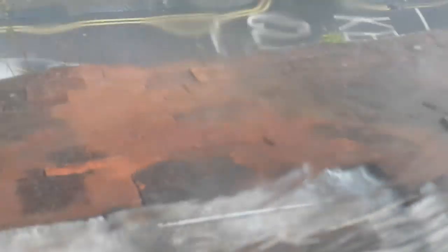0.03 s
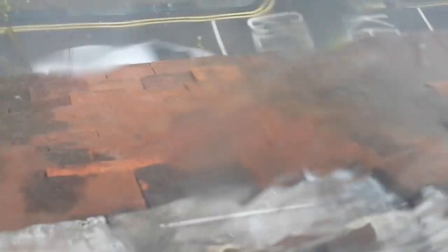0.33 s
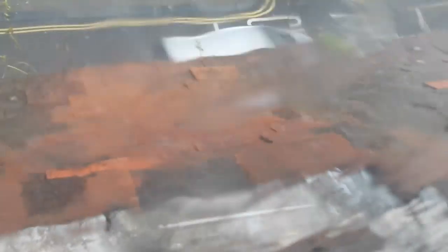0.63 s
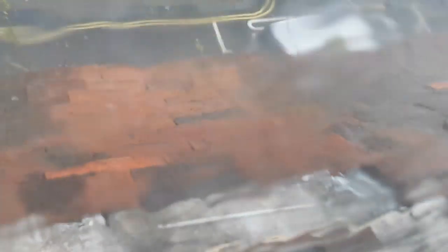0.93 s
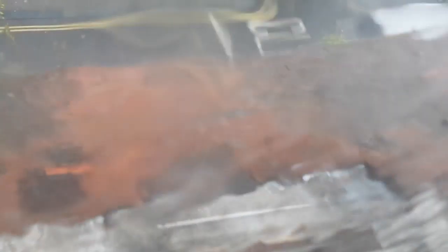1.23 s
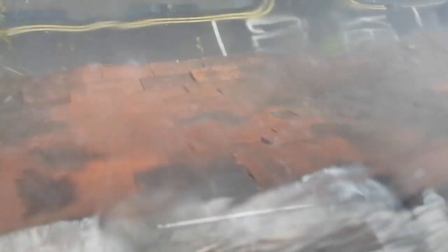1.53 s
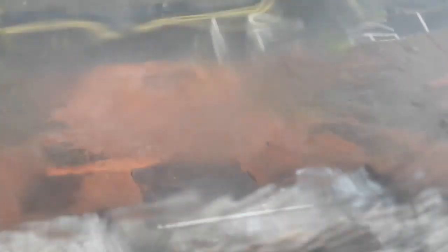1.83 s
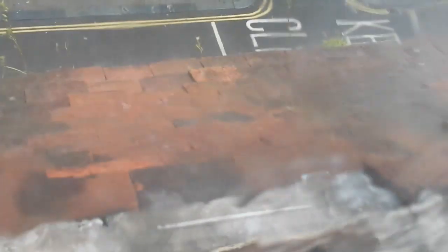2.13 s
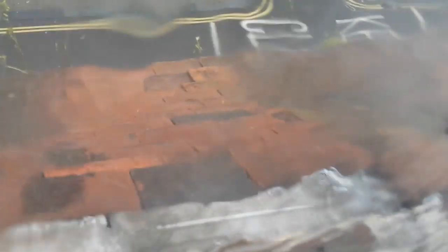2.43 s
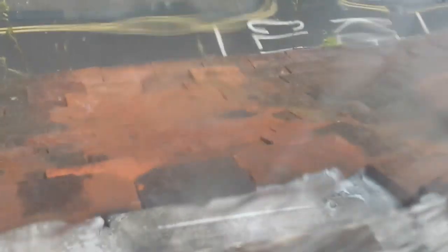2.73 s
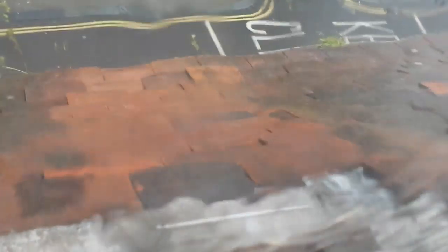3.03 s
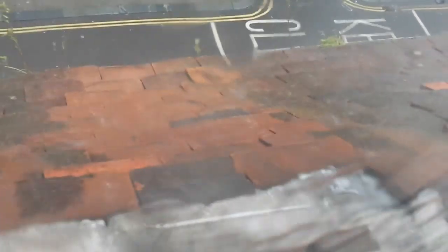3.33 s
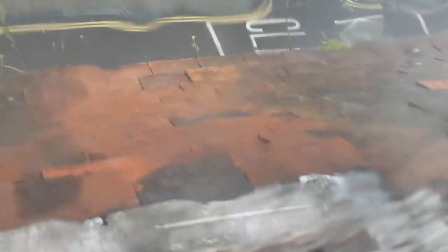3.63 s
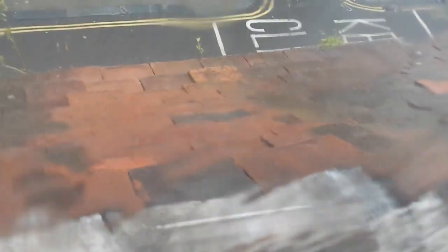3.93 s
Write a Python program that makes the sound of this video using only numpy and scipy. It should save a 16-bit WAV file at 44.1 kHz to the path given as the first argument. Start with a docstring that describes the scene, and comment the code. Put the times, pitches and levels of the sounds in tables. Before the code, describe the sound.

Heavy rain and hail strike a window, heard from just behind the glass over a low roof rumble. A gust thickens the hail, a car hisses past on the wet street, then the rain softens.

```python
"""Heavy rain and hail on a window, heard from just behind the glass. From the start, small drops
spatter and heavy ones patter over the wash of the street, the roof below rumbles, and single
hailstones ping, tick and knock close by. Half a second in, a gust swells the rain and makes the
pane drum; the hail comes thicker, and at 1.4 s a car hisses past on wet tyres. Soon after 2 s
the gust drops, leaving softer rain and a few stray stones."""
import sys
import numpy as np
from scipy import signal
from scipy.fft import rfft, irfft, next_fast_len
from scipy.io import wavfile
from scipy.ndimage import map_coordinates

SR = 44100
rng = np.random.default_rng(int(sys.argv[2]) if len(sys.argv) > 2 else 0)


def put_to_file(sound):
    """Save the sound as 16-bit audio at rate SR, in the file named by the first command-line argument."""
    columns = np.atleast_2d(sound).T  # one column per channel
    safe = np.clip(columns, -1, 1)
    whole_steps = np.round(safe * 32767)
    wavfile.write(sys.argv[1], SR, whole_steps.astype(np.int16))


N = 176400

# The gust as three fader rides, before trims (time [s], spatter [dB], patter [dB], drumming [dB])
STORM_FADERS = [(0, -36, -41.5, -39.5), (0.44, -35.5, -40.5, -37.5), (0.56, -30, -34, -34.5),
                (0.8, -29, -33.5, -31.5), (1.0, -31, -35, -33.5), (1.12, -25, -32.0, -32),
                (1.3, -26, -31.5, -30.5), (1.48, -29, -35, -35.5), (1.68, -23.5, -30.5, -32.5),
                (1.86, -29, -36, -31), (1.98, -26.5, -35.5, -36), (2.2, -34, -37.5, -36.5),
                (2.45, -36.5, -46.5, -40), (2.9, -38, -46.5, -40.5), (3.3, -37.5, -41, -36.5),
                (3.57, -36.5, -40.5, -35), (3.68, -38, -41.5, -39.5), (4, -39, -43.5, -36.5)]
# EQ of small drops, heavy drops, rain on the street and the roof (frequency [Hz], gain [dB])
SPATTER_EQ = [(700, -11), (1500, -5), (2060, -0.5), (2830, -6), (3600, -1), (4700, -2.5), (5700, 0),
              (6900, -2), (8200, -10.5), (10500, -18), (12000, -41), (15000, -47)]
PATTER_EQ = [(120, -38), (280, -5), (480, 2.5), (900, 2.5), (1130, -3.5), (1450, 2.5), (2060, -4.5),
             (2600, -10), (5000, -71)]
STREET_EQ = [(900, -46), (1170, -6.5), (1420, 0.5), (1960, -1.5), (2130, 5), (2810, -3), (3650, -5),
             (5040, -7), (6410, -2.5), (10400, -20.5), (11700, -60)]
ROOF_EQ = [(38, -40), (50, -19), (62, -7), (85, -2.5), (120, -5), (160, -1.5), (200, -1), (260, -7.5),
           (330, -12), (420, -18.5), (900, -93)]
# Cues for small stones that ring, and that only tick (time [s], relative level [dB], pitch [Hz])
PING_CUES = [(0.058, -31, 6760), (0.767, -24, 5290), (1.737, -28.5, 6600), (3.7328, -20.5, 5750)]
TICK_CUES = [(0.116, -25, 6050), (0.395, -26, 4960), (0.499, -30, 4820), (0.697, -25, 5200),
             (0.73, -22.5, 6000), (0.8138, -21.5, 3800), (0.837, -26, 5600), (0.861, -22.5, 5800),
             (0.9018, -20.5, 6800), (0.911, -24, 6200), (1.087, -22, 6570), (1.155, -25, 5800),
             (1.182, -26, 6000), (1.282, -22, 6500), (1.287, -20, 5560), (1.358, -20, 5600),
             (1.366, -22, 3700), (1.392, -23.5, 5000), (1.581, -22.5, 7540), (1.6, -15.5, 5770),
             (1.676, -28, 3970), (1.685, -18.5, 5430), (1.76, -29, 4500), (1.806, -24.5, 6300),
             (1.865, -25.5, 5840), (1.96, -20.5, 6800), (2.02, -31, 6860), (3.056, -31.5, 5260),
             (3.541, -33, 3900), (3.786, -26, 5960)]
# EQ of cracking ice (frequency [Hz], gain [dB])
CRACK_EQ = [(300, -20), (1200, 3), (2000, 7), (3000, 6.5), (6300, 8), (8000, 2), (11000, -9), (15000, -25)]
# Cues for big stones (time [s], relative level [dB], pitch [Hz], crack level [dB])
KNOCK_CUES = [(0.294, -26, 1640, -31.5), (0.508, -23.5, 1790, -29.5), (0.638, -26, 2000.0, -18.5),
              (0.786, -22.5, 1300, -34), (1.0447, -13.5, 1340, -21), (1.173, -23.5, 2010, -29),
              (1.271, -16.5, 2400, -25), (1.279, -20, 895, -26), (1.302, -23, 1440, -19.5),
              (1.306, -20, 1090, -20), (1.335, -17.5, 1900, -29), (1.634, -27, 700, -31),
              (1.745, -24, 1200, -24), (1.756, -19.5, 1600, -21), (1.85, -23.5, 1500, -33),
              (2.099, -27, 1600.0, -26.5), (2.169, -24.5, 1770, -30.5), (2.2966, -19, 1430, -26.5),
              (2.3446, -17.5, 780, -46), (3.119, -30.5, 850, -38)]
# Modes of the struck glass (frequency [Hz], gain [dB], T60 [s])
GLASS_MODES = [(370, -2, 0.069), (500, 1, 0.027), (950, -1.5, 0.0098), (1190, 1, 0.01), (1420, 2, 0.018),
               (2033, -1, 0.025)]
# EQ of wet tyres (frequency [Hz], gain [dB])
TYRE_EQ = [(200, -2), (800, -4), (2000, -3.5), (5500, 5), (8000, 0), (12000, -76)]
# Stereo image of rain, roof and car (frequency [Hz], left-right correlation [-1..1])
STEREO_IMAGE = [(60, .97), (220, 0.98), (400, 0.56), (950, 0.42), (1400, -0.13), (2200, -0.12),
                (3500, 0.083)]
# Tonal balance of the microphones (frequency [Hz], left minus right [dB])
MIC_BALANCE = [(200, -0.5), (500, 1.5), (950, -5), (1350, -1.5), (2080, 7), (2800, 1.5), (3700, 4.5),
               (5600, 3.5), (6900, -6), (8500, -2.5), (13000, -7.5)]

SPATTER_TRIM_DB, PATTER_TRIM_DB, STREET_DB, ROOF_TRIM_DB = 0.02, 0.9, -39, -0.5
SPATTER_GROWTH, PANE_GROWTH = 1.06, 1.6  # dB per dB of fader
PANE_HZ, PANE_T60_S, PANE_DB = 173.2, 0.086, -43.5  # the pane's lowest mode
CRACK_RISE_S, CRACK_T60_S, FOCUS_DB, FOCUS_OCTAVES = .0003, .014, 7.5, 0.48
PING_T60_S, PING_UPPER_RATIO, PING_CRACK_MIX = .034, 1.1, .45
TICK_TRIM_DB, KNOCK_TRIM_DB = 0.5, -0.5
KNOCK_OCTAVES, SPOT_SPREAD_DB, CONTACT_CYCLES = 0.4, 0.7, .18
CAR_NEAREST_S, CAR_DB, CAR_M_PER_S, CAR_DISTANCE_M = 1.4, -31.5, 13.4, 4.2
MIC_LAG_S, HIGH_CUT_HZ = .00027, 15700


def amp(db):
    return 10 ** (np.asarray(db) / 20)


def unit_rms(x):
    return x / np.sqrt(np.mean(x ** 2) + 1e-20)


def unit_attack(x):
    """Scale an impact to rms 1 over its first 5 ms."""
    return x / np.sqrt(np.mean(x[..., :SR // 200] ** 2))


def decay(t, t60):
    return amp(-60 * t / t60)


def curve(points, hz):
    """Read (frequency, value) points on a log frequency axis."""
    freqs, values = np.transpose(points)
    return np.interp(np.log(hz + 1), np.log(freqs + 1), values)


def filtered(x, response):
    """EQ x with a gain given as a function of frequency."""
    n = x.shape[-1]
    padded = next_fast_len(n + n // 4)
    return irfft(rfft(x, padded) * response(np.fft.rfftfreq(padded, 1 / SR)), padded)[..., :n]


def stereo_bed(pair, eq):
    """EQ two unrelated signals into a stereo bed of rms 1, near mono in the bass."""
    def response(hz):
        width = np.arccos(np.clip(curve(STEREO_IMAGE, hz), -1, 1)) / 2
        return amp(curve(eq, hz)) * [np.cos(width), np.sin(width)]
    mid, side = filtered(pair, response)
    return unit_rms(np.array([mid + side, mid - side]))


def place(out, time_s, hit):
    """Lay in a close hit; it reaches the right microphone first."""
    for channel, start in enumerate([time_s + MIC_LAG_S / 2, time_s - MIC_LAG_S / 2]):
        part = out[channel, max(round(start * SR), 0):][:hit.shape[1]]
        part += hit[channel, :len(part)]


def drops(per_s, t60, spread_db=3, spots=14):
    """Drops of random size land on many spots; each spot answers with its own short burst."""
    t = np.arange(SR // 25) / SR
    out = np.zeros((2, N))
    count = int(per_s * N / SR / spots)
    for _ in range(spots):
        burst = rng.standard_normal((2, len(t))) * decay(t, t60)
        onsets = (rng.random(count) * N).astype(int)
        sizes = amp(spread_db * np.clip(rng.standard_normal(count), -2, 2))
        hits = np.bincount(onsets, sizes, N)
        out += signal.oaconvolve(hits[None], unit_rms(burst), axes=1)[:, :N]
    return out


def rain(spatter_db, patter_db, flurry_db=.8, flurry_hz=25.9):
    """Small drops spatter and heavy ones patter on the glass, over the even wash of the street."""
    knots = rng.standard_normal(400)
    flutter_db = flurry_db * map_coordinates(knots, [np.arange(N) * flurry_hz / SR], mode="wrap")
    spatter_db = spatter_db.max() + SPATTER_GROWTH * (spatter_db - spatter_db.max())
    spatter = stereo_bed(drops(per_s=1800, t60=.011), SPATTER_EQ) * amp(spatter_db + SPATTER_TRIM_DB)
    patter = stereo_bed(drops(per_s=900, t60=.024), PATTER_EQ) * amp(patter_db + PATTER_TRIM_DB)
    street = amp(STREET_DB) * stereo_bed(rng.standard_normal((2, N)), STREET_EQ)
    return amp(flutter_db) * (spatter + patter) + street


def roof(drumming_db):
    """The low end: the roof rumbles under the downpour."""
    return amp(drumming_db + ROOF_TRIM_DB) * stereo_bed(rng.standard_normal((2, N)), ROOF_EQ)


def pane(drumming_db):
    """The pane booms in its lowest mode when the gust hits it."""
    t = np.arange(SR // 2) / SR
    ring = np.sin(2 * np.pi * PANE_HZ * t) * decay(t, PANE_T60_S)
    boom = unit_rms(signal.fftconvolve(rng.standard_normal(N), ring)[:N])
    return boom * amp(PANE_DB + PANE_GROWTH * (drumming_db - drumming_db.mean()))


def crack(t, pitch_hz):
    """Ice meets a hard surface: a bright, brief burst with a bell boost at its pitch."""
    envelope = (1 - np.exp(-t / CRACK_RISE_S)) * decay(t, CRACK_T60_S)
    burst = rng.standard_normal((2, len(t))) * envelope
    bell_db = lambda hz: FOCUS_DB * np.exp(-.5 * (np.log2((hz + 1) / pitch_hz) / FOCUS_OCTAVES) ** 2)
    return unit_attack(filtered(burst, lambda hz: amp(curve(CRACK_EQ, hz) + bell_db(hz))))


def hail_pings(t):
    """Small stones ring like glass: a crack, a ringing mode and a briefer one just above it."""
    out = np.zeros((2, N))
    for time_s, db, hz in PING_CUES:
        phase = rng.random((2, 1))  # one for each microphone
        lower = np.sin(2 * np.pi * (hz * t + phase)) * decay(t, PING_T60_S)
        upper = 2 * np.sin(2 * np.pi * (PING_UPPER_RATIO * hz * t + phase)) * decay(t, CRACK_T60_S)
        ring = unit_attack((lower + upper) * (1 - np.exp(-t / CRACK_RISE_S)))
        place(out, time_s, amp(db) * (ring + PING_CRACK_MIX * crack(t, hz)))
    return out


def hail_ticks(t):
    """Small stones tick: all crack, no ring."""
    out = np.zeros((2, N))
    for time_s, db, hz in TICK_CUES:
        place(out, time_s, amp(db + TICK_TRIM_DB) * crack(t, hz))
    return out


def hail_knocks(t):
    """Big stones knock the glass modes near their own pitch, with a crack on top."""
    out = np.zeros((2, N))
    mode_hz, mode_db, t60 = np.transpose(GLASS_MODES)[:, :, None]
    modes = np.cos(2 * np.pi * mode_hz * t) * decay(t, t60)
    for time_s, db, pitch_hz, crack_db in KNOCK_CUES:
        spot_db = rng.normal(0, SPOT_SPREAD_DB, mode_hz.shape)  # each spot favours other modes
        weights = amp(mode_db + spot_db) / (1 + (np.log2(mode_hz / pitch_hz) / KNOCK_OCTAVES) ** 2)
        attack = 1 - np.exp(-t * pitch_hz / CONTACT_CYCLES)  # dull blows rise more slowly
        body = unit_attack(attack * np.sum(weights * modes, axis=0))
        place(out, time_s, amp(db + KNOCK_TRIM_DB) * body + amp(crack_db) * crack(t, pitch_hz=4120))
    return out


def recess_reverb(hits, send_db=-15, t60=.05, predelay_s=.002):
    """The walls around the window give each hit a brief tail."""
    t = np.arange(SR // 8) / SR
    tail = rng.standard_normal((2, len(t))) * decay(t, t60) * (t > predelay_s)
    return amp(send_db) * signal.fftconvolve(hits, tail / np.linalg.norm(tail[0]), axes=1)[:, :N]


def car_pass():
    """Wet tyres hiss, swelling as the car nears and fading as it leaves."""
    distance = np.hypot(CAR_DISTANCE_M, CAR_M_PER_S * (np.arange(N) / SR - CAR_NEAREST_S))
    hiss = stereo_bed(rng.standard_normal((2, N)), TYRE_EQ)
    return amp(CAR_DB) * CAR_DISTANCE_M / distance * hiss


def scene():
    """The mix: rain, roof and pane ride the gust, under the hail and the passing car."""
    times, *faders = np.transpose(STORM_FADERS)
    spatter_db, patter_db, drumming_db = [np.interp(np.arange(N) / SR, times, db) for db in faders]
    beds = rain(spatter_db, patter_db) + roof(drumming_db) + pane(drumming_db)
    hit_t = np.arange(SR // 16) / SR  # time axis of one hailstone
    hail = hail_pings(hit_t) + hail_ticks(hit_t) + hail_knocks(hit_t)
    return beds + hail + recess_reverb(hail) + car_pass()


def record(dry):
    """Each microphone has its own colour; a steep high cut takes off the very top."""
    sides = np.array([[.5], [-.5]])
    return filtered(dry, lambda hz: amp(curve(MIC_BALANCE, hz) * sides) * (hz < HIGH_CUT_HZ))


dry = scene()
out = record(dry)
put_to_file(out)
```